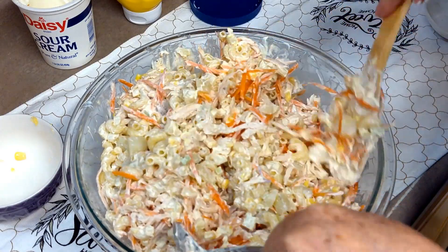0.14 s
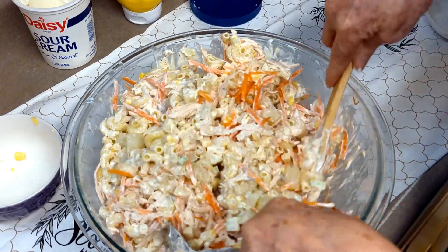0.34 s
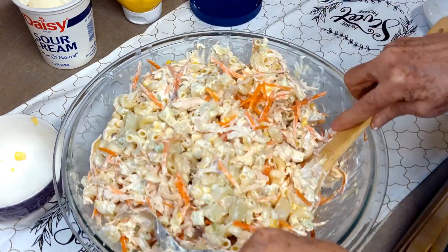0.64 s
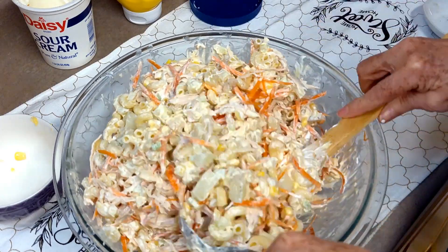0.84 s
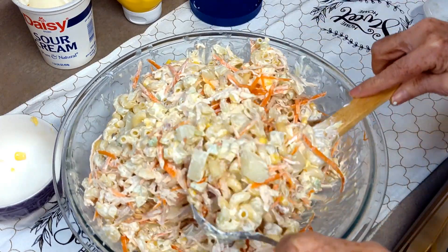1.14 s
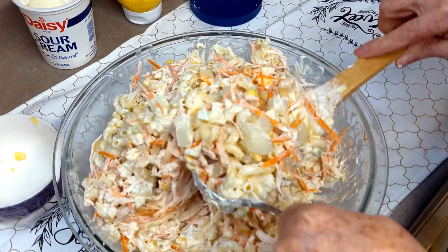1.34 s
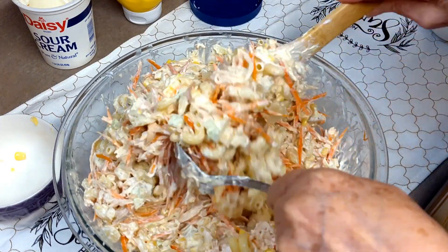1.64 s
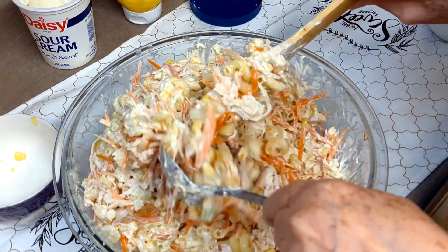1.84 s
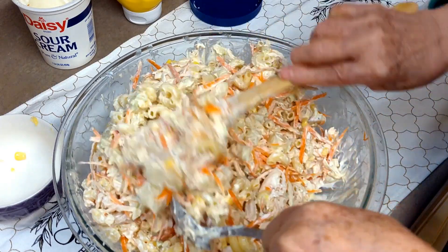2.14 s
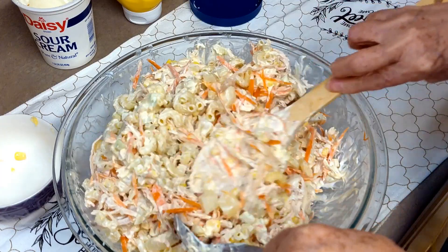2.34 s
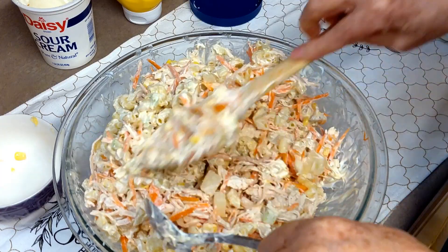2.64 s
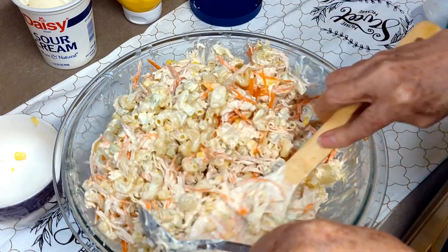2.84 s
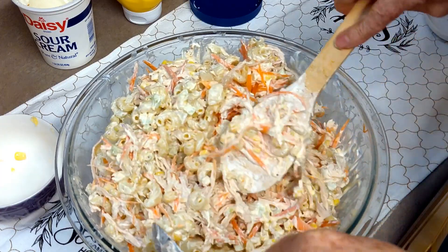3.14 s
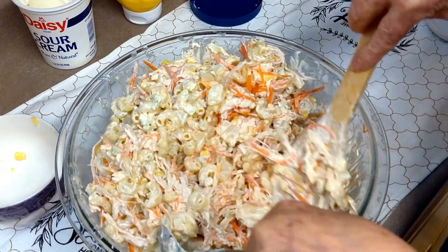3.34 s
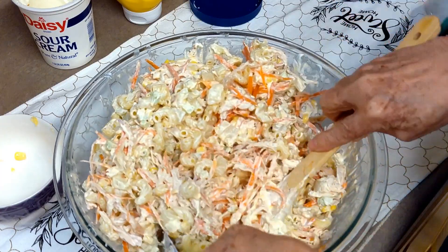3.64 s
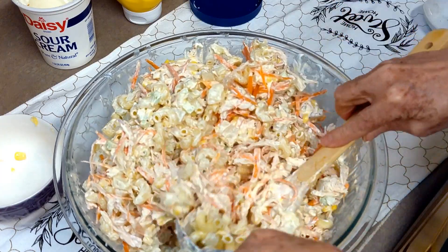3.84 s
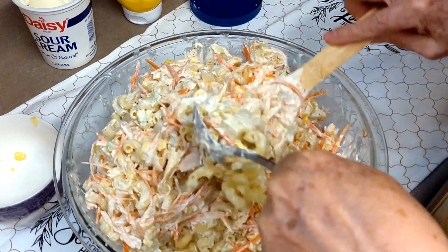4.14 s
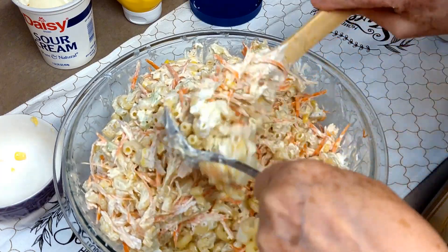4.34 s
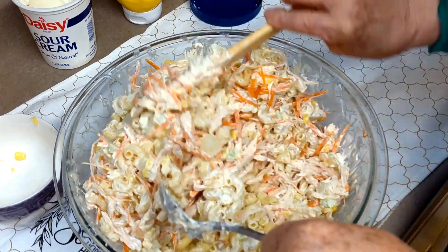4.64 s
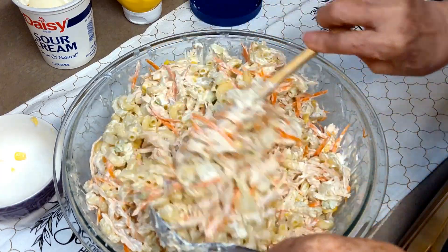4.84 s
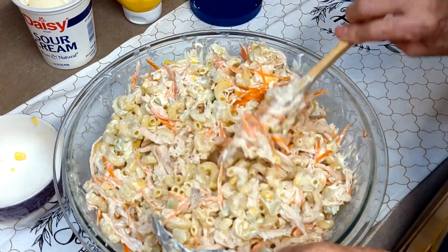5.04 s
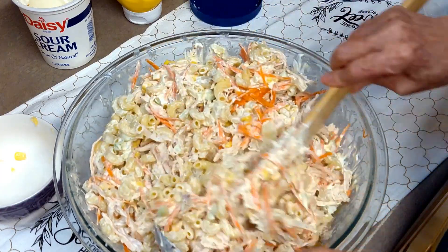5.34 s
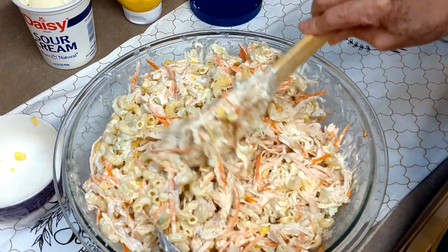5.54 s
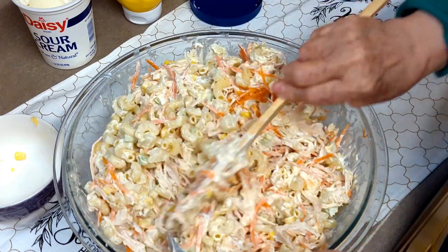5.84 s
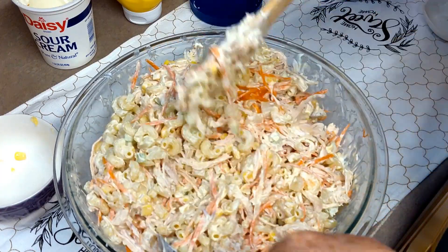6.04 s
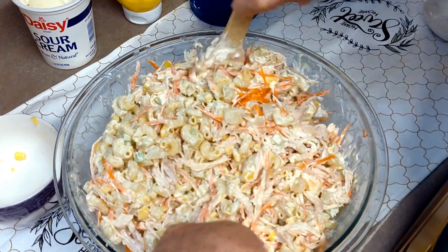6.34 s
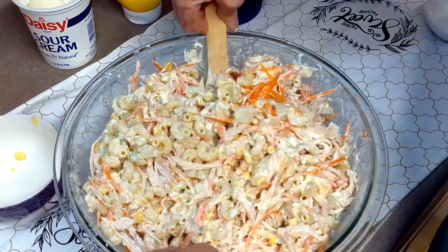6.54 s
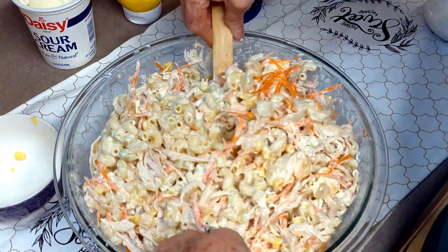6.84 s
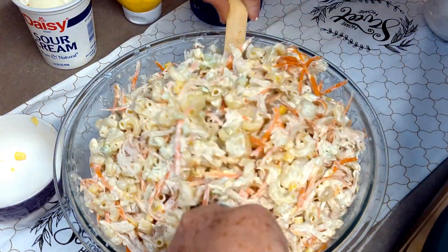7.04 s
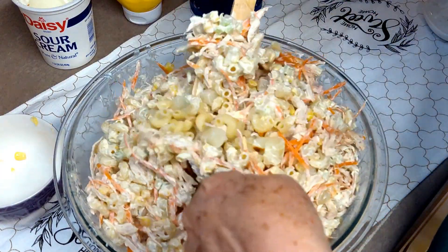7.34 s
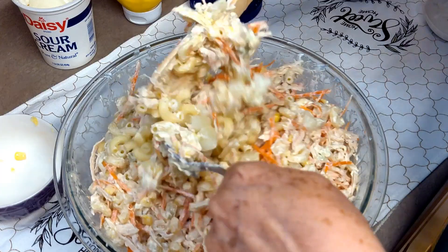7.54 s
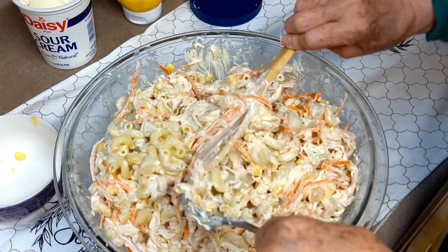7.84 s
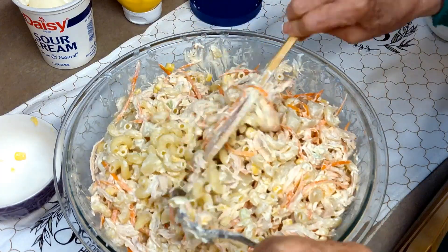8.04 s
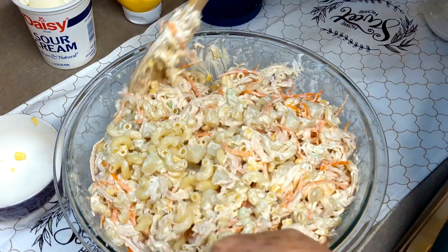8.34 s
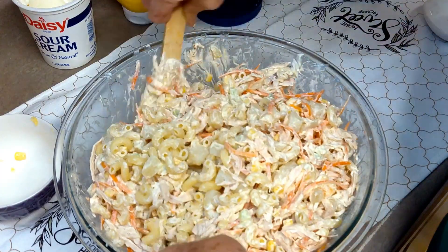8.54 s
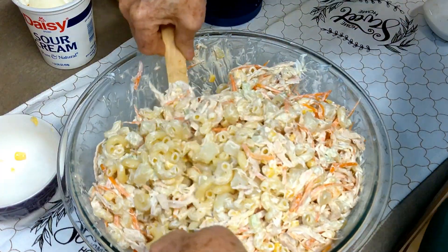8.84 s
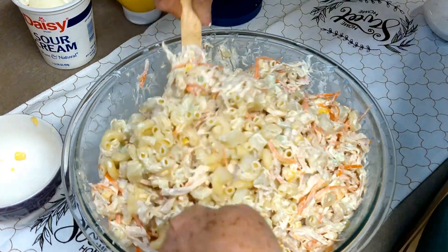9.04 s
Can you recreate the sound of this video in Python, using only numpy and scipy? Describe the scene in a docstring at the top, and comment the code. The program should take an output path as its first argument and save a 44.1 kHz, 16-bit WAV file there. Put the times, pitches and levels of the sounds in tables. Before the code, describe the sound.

In a small home kitchen with a faint motor hum, a spoon clinks a large full glass bowl and scrapes it briefly. Soft wet folding follows, with sticky squelches, crackling dressing and dull wooden knocks against the glass. After quieter stretches, a sharper clack comes near six seconds, a hollow knock near eight, then a bright rim clink and a last knock. Everything is close, heard from just above the bowl.

```python
"""Faint kitchen air and a motor hum, then a spoon rings a big glass bowl on the kitchen table.
A wooden and a metal spoon fold a creamy pasta salad: clinks and knocks are decaying modes and noise bursts,
rubs are trains of tiny slips, and the wet salad is many short decaying tones with pops and rasps.
A small room answers the rubs and wet sounds; shoves rumble and bumps thump on the table.
All of it is heard close, at one microphone above the bowl."""
import sys
import numpy as np
from scipy import signal
from scipy.fft import rfft, irfft, next_fast_len
from scipy.io import wavfile
from scipy.ndimage import uniform_filter1d, map_coordinates

SR = 44100
rng = np.random.default_rng(int(sys.argv[2]) if len(sys.argv) > 2 else 0)


def unload_wav(signal):
    """Save mono or channel-first audio to the path in sys.argv[1] as 16-bit WAV at rate SR, clipped to [-1, 1]."""
    wavfile.write(
        sys.argv[1],
        SR,
        np.round(np.clip(np.atleast_2d(signal).T, -1, 1) * 32767).astype(np.int16),
    )


N = 404838  # length [samples]

# Modes of the filled glass bowl:
# (frequency [Hz], t60 [s], level struck on the wall [dB], level struck on the rim [dB])
GLASS_MODES = [(250, .19, -18, -37), (377, .18, -9, -22), (595, .15, -10, -32), (622, .15, -12, -30),
               (861, .15, -4, -15), (1017, .175, 8, 1.5), (1042, .24, -16, -11), (1124, .17, -23, -12),
               (1887, .27, -23, -25), (2205, .11, -39, -10), (2502, .13, -40, -15), (2653, .15, -38, -14),
               (2885, .2, -30, -13), (2965, .22, -16, -7), (4178, .23, -14, -4), (4388, .12, -34, -15),
               (4740, .11, -12, -14), (4852, .1, -17, -3), (5562, .18, -12, -12), (5654, .095, -11, 1),
               (6068, .12, -28, -9), (6362, .1, -20, -3), (6465, .19, -36, -13), (7376, .17, -38, -19),
               (7701, .16, -44, -24), (10095, .14, -43, -20)]
# Resonances of the bowl's hollow: (frequency [Hz], width [Hz], level [dB])
HOLLOW_MODES = [(585, 36, -1), (719, 17, -3.5), (831.4, 35, 4), (928.5, 45, 4.5)]
# Spectrum of squelching air pockets and food: (frequency [Hz], density [dB per Hz])
SQUELCH_SPECTRUM = [(400, -17), (1000, 10.5), (1850, -5.5), (2450, 2.5), (3300, -18.5), (4700, -10.5),
                    (9000, -39)]
# Spectrum of snapping dressing: (frequency [Hz], density [dB per Hz])
CRACKLE_SPECTRUM = [(1500, -16.5), (3500, -7.5), (4600, 8.5), (5500, -3), (6500, 5), (8200, -17.5),
                    (11000, -30.5), (12000, -46.5)]


def amp(db):
    """Decibels to gain."""
    return 10 ** (np.asarray(db) / 20)


def unit(x):
    """x at rms 1."""
    return x / np.sqrt(np.mean(x ** 2) + 1e-20)


def along(points, hz):
    """(Hz, value) points read on a log frequency axis."""
    f, v = np.transpose(points)
    return np.interp(np.log(hz + 1), np.log(f + 1), v)


def wobble(rate):
    """A smooth random curve through rate knots a second."""
    knots = rng.standard_normal(int(N * rate / SR) + 4)
    return map_coordinates(knots, [np.arange(N) * rate / SR])


def filtered(x, response):
    """x times a response of frequency."""
    m = next_fast_len(len(x) + SR // 4)
    return irfft(rfft(x, m) * response(np.fft.rfftfreq(m, 1 / SR)), m)[:len(x)]


def coloured(x, spectrum):
    """x shaped by (Hz, dB) points."""
    return filtered(x, lambda hz: amp(along(spectrum, hz)))


def resonate(x, peaks):
    """x through parallel (Hz, width in Hz, dB) resonances."""
    def response(f):
        return sum(amp(db) * 1j * f * width / (centre ** 2 - f * f + 1j * f * width)
                   for centre, width, db in peaks)
    return filtered(x, response)


def add(track, s, sound):
    """Mix a sound into the track at s seconds."""
    part = track[round(s * SR):][:len(sound)]
    part += sound[:len(part)]


def fade(t, attack, t60):
    """A quick rise and an exponential fall."""
    return (1 - np.exp(-t / attack)) * amp(-60 * t / t60)


def stroke(start, length, attack, release):
    """The effort of one spoon movement, 0 to 1: it builds up, holds and lets go."""
    t = np.arange(N) / SR - start
    return np.clip(np.minimum(t / attack, 1 - (t - length) / release), 0, 1)


def ticks(rate, spread_db):
    """Impulses at random moments, about rate a second, of random sign and size."""
    present = rng.random(N) < rate / SR
    size = amp(spread_db * np.minimum(rng.exponential(size=N), 3))
    return present * rng.choice([-1, 1], N) * size


def in_room(x, wet_db):
    """x with the kitchen's short, dense answer: noise that decays at its own rate in each band."""
    # decay of the room: (frequency [Hz], t60 [s])
    room_decay = [(200, 0.58), (1500, 0.042), (5000, 0.2), (11000, 0.2)]
    hz, t, z = signal.stft(rng.standard_normal(SR // 2), SR, nperseg=256)
    decay = amp(-60 * t / along(room_decay, hz)[:, None])
    tail = signal.istft(z * decay, SR, nperseg=256)[1]
    return x + amp(wet_db) * signal.fftconvolve(x, tail / np.linalg.norm(tail))[:N]


def kitchen(air_db=-63, whine_hz=5060, whine_width=170, whine_db=-89):
    """Low room noise, a slightly unsteady motor hum and a thin, wavering hiss."""
    # spectrum of the kitchen background: (frequency [Hz], density [dB per Hz])
    air_spectrum = [(20, -2), (50, -13), (80, -27), (155, -9.5), (200, -18), (290, -10.5), (400, -13.5),
                    (780, -16.5), (1100, -25), (1650, -34), (2400, -36.5), (3500, -40.5), (5500, -41.5),
                    (7500, -43.5), (10500, -41.5), (11500, -51.5)]
    # partials of the appliance motor: (frequency [Hz], mean level [dB])
    hum_partials = [(118.4, -75.5), (177.6, -75), (236.9, -70.5), (296.1, -69)]
    t = np.arange(N) / SR
    air = unit(coloured(rng.standard_normal(N), air_spectrum)) * amp(air_db + 0.38 * wobble(5.4))
    drift = 0.00011 * wobble(5.5)  # seconds, shared by all partials
    hum = np.zeros(N)
    for hz, db in hum_partials:
        level = np.sqrt(2) * amp(db + 1.0 * wobble(2.4))  # rms to peak
        hum += level * np.sin(2 * np.pi * hz * (t + drift))
    band = [(whine_hz, whine_width, 0)]
    whine = unit(resonate(resonate(rng.standard_normal(N), band), band))
    return air + hum + whine * amp(whine_db + 1.4 * wobble(7.2))


def shifting(lean_db=-65.5, lump_db=4, attack_s=0.02, release_s=0.042):
    """The leaned-on and shoved bowl rumbles softly and unevenly on the table: low noise under the push."""
    # shoves of the bowl: (start [s], length [s], rumble level [dB])
    shove_list = [(0.194, 0.2, -59.5), (.54, 0.21, -60.5), (2.957, 0.21, -55), (3.32, 0.66, -65.5),
                  (4.134, 0.48, -58.5), (6.585, 0.42, -60.5), (8.55, 0.16, -54.5)]
    # spectrum of the bowl's foot on the table: (frequency [Hz], density [dB per Hz])
    rumble_spectrum = [(20, -0.5), (45, -3.5), (80, -16.5), (150, -9), (220, -14.5), (500, -43.5),
                       (1500, -120)]
    push = amp(lean_db)  # the spoons only lean on the bowl
    for s, length, db in shove_list:
        push = push + amp(db) * stroke(s, length, attack_s, release_s)
    return push * unit(coloured(rng.standard_normal(N), rumble_spectrum) * amp(lump_db * wobble(12)))


def bubbles(rate, centre_hz, pitch_spread, cycles, spread_db):
    """Small bursting films at random moments: short tones, each with its own pitch and size."""
    n = int(rate * N / SR)
    when, pitch, size = rng.random((n, 3)).T[:, :, None]
    hz = centre_hz * np.exp(pitch_spread * np.arcsin(2 * pitch - 1))
    t = np.arange(SR // 40) / SR
    # each tone falls by 60 dB in the given number of cycles
    grains = amp(spread_db * size ** 2) * np.sin(2 * np.pi * hz * t) * fade(t, 2 / hz, cycles / hz)
    index = (when * N).astype(int) + np.arange(len(t))
    return unit(np.bincount(index.ravel(), grains.ravel(), N)[:N])


def scattered(x, rise_s=.0025, t60_s=.07, scatter_db=5):
    """x with many quick reflections around the inside of the bowl, at about the same power."""
    t = np.arange(SR // 8) / SR
    echoes = rng.standard_normal(len(t)) * fade(t, rise_s, t60_s)
    mix = x + amp(scatter_db) * signal.fftconvolve(x, echoes / np.linalg.norm(echoes))[:N]
    return mix / np.hypot(1, amp(scatter_db))


def salad(smear_db=-4, clump_db=2.5, attack_s=0.032, release_s=0.053):
    """Each fold opens air pockets and snaps films of dressing, over a fine sticky smear."""
    # folds of a spoon through the salad:
    # (start [s], length [s], air-pocket squelch level [dB], dressing crackle level [dB])
    fold_list = [(0.437, 0.63, -83, -86.5), (2.222, 0.14, -84, -70.5), (2.37, 0.24, -78, -80),
                 (2.832, 0.082, -83, -66), (2.938, 0.19, -67.5, -82), (3.553, 0.048, -79, -61.5),
                 (3.982, 0.31, -78.5, -85), (4.772, 0.2, -74, -77), (5.363, 0.13, -62, -66),
                 (5.53, 0.13, -79, -71), (5.868, 0.162, -69.5, -63), (6.298, 0.21, -82.5, -72),
                 (6.503, 0.16, -77, -77), (6.86, 0.45, -76, -86.5), (8.566, 0.14, -63.5, -70.5),
                 (8.763, 0.18, -70, -87.5)]
    squelch_gain, crackle_gain = amp(-91.5), amp(-86)  # the salad settling between folds
    for s, length, squelch_db, crackle_db in fold_list:
        effort = stroke(s, length, attack_s, release_s)
        squelch_gain = squelch_gain + amp(squelch_db) * effort
        crackle_gain = crackle_gain + amp(crackle_db) * effort
    squelch = bubbles(rate=130, centre_hz=2450, pitch_spread=.08, cycles=18, spread_db=11)
    crackle = unit(sum(bubbles(rate=60, centre_hz=hz, pitch_spread=.125, cycles=19, spread_db=16)
                       for hz in (4650, 6400)))
    squelch += amp(smear_db) * unit(coloured(ticks(300, spread_db=5), SQUELCH_SPECTRUM))
    crackle += amp(smear_db) * unit(coloured(ticks(500, spread_db=5), CRACKLE_SPECTRUM))
    wet = scattered(squelch) * squelch_gain + scattered(crackle) * crackle_gain
    return in_room(wet * amp(clump_db * wobble(22)), wet_db=-9.5)


def glass_ring(t, drive, place=0, scatter_db=1.5):
    """The bowl's modes after one blow; drive is the blow's strength at each frequency."""
    place = np.clip(place, 0, 1)  # 0 wall, 1 rim
    rise_cycles = 3  # low modes build up more slowly
    blur_hz = 4  # the shifting load roughens every mode
    split_hz, twin_db = 16, -14  # the bowl is not quite round: each mode beats with a weaker twin

    def tone(hz):
        drift = np.cumsum(rng.standard_normal(len(t))) * np.sqrt(2 * np.pi * blur_hz / SR)
        return np.sin(2 * np.pi * (hz * t + rng.random()) + drift)

    ring = np.zeros(len(t))
    for hz, t60, wall_db, rim_db in GLASS_MODES:
        level_db = wall_db + place * (rim_db - wall_db) + scatter_db * rng.normal()
        pair = tone(hz) + amp(twin_db) * tone(hz + split_hz * rng.normal())
        ring += amp(level_db) * drive(hz) * fade(t, rise_cycles / hz, t60) * pair
    return ring


def hollow_ring(t):
    """The bowl's hollow after one blow: a few low tones, the wider the sooner gone."""
    ring = np.zeros(len(t))
    for hz, width, db in HOLLOW_MODES:
        t60 = np.log(1000) / np.pi / width
        tone = np.sin(2 * np.pi * (hz * t + rng.random()))
        ring += amp(db + rng.normal()) * tone * fade(t, .002, t60)
    return ring / 2


def patchy(n, depth_db=5):
    """Noise whose narrow bands swell and sink, like many close overtones beating."""
    z = signal.stft(rng.standard_normal(n), nperseg=512)[2]
    field = uniform_filter1d(rng.standard_normal(z.shape), size=7, axis=1)
    return unit(signal.istft(z * amp(depth_db * unit(field)), nperseg=512)[1][:n])


def clinks(crack_t60=0.076, shimmer_t60=0.27):
    """A hard blow cracks, rings the glass and its hollow and leaves an uneven, noisy shimmer."""
    # sharp blows on the bare glass: (time [s], place [0 wall - 1 rim], ring level [dB], crack level [dB],
    # brightness [dB per octave], shimmer level [dB], hollow level [dB])
    clink_list = [(0.202, 0.02, -14.5, -15, 2.5, -26, -28), (8.371, 1, -13.5, -3.5, 3, -19, -38.5)]
    # spectrum of the hard contact: (frequency [Hz], density [dB per Hz])
    crack_spectrum = [(60, -18.5), (250, -12), (520, -16.5), (950, 9), (1400, -5), (1950, -15), (2500, -6),
                      (3400, -13.5), (4700, -3), (6300, -2.5), (8200, -23), (11000, -30), (12000, -56)]
    out, t = np.zeros(N), np.arange(SR // 2) / SR
    for s, place, ring_db, crack_db, tilt, shimmer_db, hollow_db in clink_list:
        crack = amp(crack_db) * rng.standard_normal(len(t)) * fade(t, .002, crack_t60)
        shimmer = amp(shimmer_db) * patchy(len(t)) * fade(t, .006, shimmer_t60)
        bright = filtered(coloured(crack + shimmer, crack_spectrum),
                          lambda hz: amp(tilt * np.log2((hz + 50) / 1000)))
        ring = amp(ring_db) * glass_ring(t, lambda hz: 1, place)
        add(out, s, ring + amp(hollow_db) * hollow_ring(t) + bright)
    return out


def hollowed(x, edge_hz=1250):
    """x through the hollow of the bowl, which passes little treble."""
    return filtered(resonate(x, HOLLOW_MODES), lambda hz: 1 / (1 + (hz / edge_hz) ** 6))


def rubs(slip_rate=1400, hollow_db=-9, glass_db=-3, groan_db=0.0, waver=0.02, soft_hz=4700, place=0.17,
         grit_db=-21, slack=.08):
    """Tiny slips of a spoon keep glass and hollow sounding; under full pressure they lock into a groan."""
    # drags of a spoon along the glass:
    # (start [s], length [s], level [dB], groan pitch at full pressure, before waver [Hz])
    rub_list = [(0.257, 0.073, -40, 993), (0.299, 0.021, -44, 875), (0.349, 0.038, -45, 895),
                (3.3, 0.064, -58, 1027), (3.382, 0.095, -47.5, 846), (6.53, 0.1, -58, 996),
                (6.571, 0.038, -47.5, 1000)]
    attack_s, release_s = 0.015, 0.032
    damped_hz = 7  # the pressing spoon widens every mode
    modes = [(hz, damped_hz + np.log(1000) / np.pi / t60, wall_db + place * (rim_db - wall_db))
             for hz, t60, wall_db, rim_db in GLASS_MODES]
    slips = ticks(slip_rate, spread_db=-0.5)
    glass = filtered(resonate(slips, modes), lambda hz: 1 / (1 + (hz / soft_hz) ** 6))
    sound = amp(glass_db) * unit(glass) + amp(hollow_db) * unit(hollowed(hollowed(slips)))
    sound += amp(grit_db) * unit(coloured(slips, SQUELCH_SPECTRUM))  # food caught under the spoon
    speed, grip = 1 + waver * wobble(60), amp(3.5 * wobble(45))
    out = np.zeros(N)
    for s, length, db, groan_hz in rub_list:
        pressure = stroke(s, length, attack_s, release_s)
        clock = np.cumsum(speed + slack * (1 - pressure)) / SR  # the groan sinks as the spoon bears down
        groan = unit(np.sin(2 * np.pi * groan_hz * clock) * grip)
        out += amp(db) * pressure * (sound + amp(groan_db) * groan * pressure)
    return in_room(out, wet_db=-4.5)


def pops(pop_db=-7, snap_db=-19, pop_t60=0.022, snap_t60=0.029, wet_db=1):
    """An air pocket tears open with a wet snap and rings briefly at its pitch; low pockets snap dully."""
    # single air pockets bursting: (time [s], level [dB], pitch [Hz])
    pop_list = [(0.374, -37.5, 4730), (0.457, -47, 4660), (0.999, -46, 6300), (1.3, -50.5, 6010),
                (2.4017, -36.5, 4000), (2.6, -42, 2440), (3.0374, -33, 2160), (3.6, -35.5, 4230),
                (3.685, -29, 3370), (4.492, -35.5, 2780), (5.393, -32.5, 3600), (5.441, -32.5, 6070),
                (5.465, -33, 2650), (5.887, -39, 4650), (6.503, -36.5, 6060), (6.597, -40, 4270),
                (6.7, -43.5, 4730)]
    half_width = .12  # half bandwidth of a pocket, as a share of its pitch
    out, t = np.zeros(N), np.arange(SR // 10) / SR
    for s, db, hz in pop_list:
        tear, spray = rng.standard_normal((2, len(t)))
        cavity = [(hz, 2 * half_width * hz, 0)]
        ring = unit(resonate(resonate(tear, cavity), cavity)) * fade(t, 0.0046, pop_t60)
        wet_noise = coloured(spray, CRACKLE_SPECTRUM) + coloured(spray, SQUELCH_SPECTRUM)
        snap = unit(filtered(wet_noise, lambda f: 1 / (1 + (f / (2 * hz)) ** 2)))
        add(out, s, amp(db) * (amp(pop_db) * ring + amp(snap_db) * snap * fade(t, 0.00022, snap_t60)))
    return in_room(out, wet_db)


def knocks(clack_t60=0.11, tail_t60=0.26, tail_db=-11, mute_t60=0.98, thud_t60=0.12):
    """Wood cushioned by salad: the softer the contact, the duller the clack; the table takes the push."""
    # wooden spoon blows: (time [s], clack level [dB], contact corner [Hz], hollow level [dB],
    # glass ring level [dB], table thud level [dB], thud corner [Hz])
    knock_list = [(0.614, -33.5, 2080, -32, -42, -28.5, 240), (2.863, -22, 1700, -35.5, -66, -43, 181),
                  (3.168, -37, 3170, -43, -52, -59, 200), (3.623, -17, 2050, -31.5, -47.5, -29, 219),
                  (5.907, -15, 6900, -64, -36, -53, 400), (5.914, -26, 2000, -50, -44, -31.5, 330),
                  (5.978, -46, 1600, -55, -50.5, -49, 200), (6.725, -36, 3150, -69, -62, -62, 200),
                  (7.942, -18, 2450, -25.5, -40.5, -52, 400), (8.737, -19.5, 2400, -23.5, -44, -27, 315)]
    # spectrum of wood on glass: (frequency [Hz], density [dB per Hz])
    clack_spectrum = [(60, -72), (330, -2), (500, -3.5), (1000, 0), (1400, -7), (1950, -11), (2250, -4),
                      (2600, -5.5), (3300, -11.5), (4500, -3), (6500, -3.5), (8500, -15.5), (11000, -27.5),
                      (12000, -44.5)]
    # spectrum of the table: (frequency [Hz], density [dB per Hz])
    thud_spectrum = [(20, -4), (45, -4.5), (75, -5), (125, -2.5), (180, -11), (240, 3.5), (350, -4),
                     (600, 3), (2000, -55)]
    out, t = np.zeros(N), np.arange(SR // 2) / SR
    for s, clack_db, corner_hz, hollow_db, ring_db, thud_db, thud_hz in knock_list:
        drive = lambda hz: 1 / np.sqrt(1 + (hz / corner_hz) ** 6)
        clack_noise, thud_noise = rng.standard_normal((2, len(t)))
        contact_s = 4 / corner_hz  # soft contacts build up slowly
        clack_fade = fade(t, contact_s, clack_t60) + amp(tail_db) * fade(t, 0.02, tail_t60)
        clack = filtered(coloured(clack_noise, clack_spectrum), drive) * clack_fade
        push = filtered(coloured(thud_noise, thud_spectrum), lambda hz: 1 / (1 + (hz / thud_hz) ** 4))
        thud = unit(push) * fade(t, 0.0097, thud_t60)
        ring = glass_ring(t, drive) * amp(-60 * t / mute_t60)  # the spoon stays on the glass and mutes it
        blow = amp(clack_db) * clack + amp(hollow_db) * hollow_ring(t)
        add(out, s, blow + amp(ring_db) * ring + amp(thud_db) * thud)
    return out


def bumps(attack_s=0.0035, cycles=13.4):
    """The bowl rocks and drops back on the table: a low tone that falls by 60 dB in a few cycles."""
    # thumps of the bowl: (time [s], level [dB], pitch [Hz])
    bump_list = [(0.656, -40, 48.4), (2.955, -52, 29.5), (4.425, -53, 36), (6.781, -36, 106),
                 (6.79, -45, 38)]
    out, t = np.zeros(N), np.arange(SR // 2) / SR
    for s, db, hz in bump_list:
        add(out, s, amp(db) * np.sin(2 * np.pi * hz * t) * fade(t, attack_s, cycles / hz))
    return out


def squeak(start_s=1.23, length_s=0.027, edge_s=.01, level_db=-67.5, pitch_hz=3870):
    """Wet food slips on the glass with one brief, thin, slightly wavering tone."""
    clock = np.cumsum(1 + .004 * wobble(80)) / SR
    return amp(level_db) * stroke(start_s, length_s, edge_s, edge_s) * np.sin(2 * np.pi * pitch_hz * clock)


def sucks(wet_db=-3, attack_s=0.018, length_s=0.0064, release_s=0.034):
    """Salad peels off a spoon: a run of tiny tears keeps one air pocket sounding as a narrow rasp."""
    # salad peeling off: (time [s], level [dB], pitch [Hz])
    suck_list = [(2.959, -54, 2360), (4.11, -71, 2800), (4.766, -56, 2190), (6.62, -53, 2380),
                 (6.642, -56, 2580), (8.657, -55, 2350), (8.82, -55, 2460), (8.867, -59, 2430),
                 (9.045, -56, 2460)]
    width = 0.18  # of each resonance, as a share of the pitch
    out = np.zeros(N)
    for s, db, hz in suck_list:
        cavity = [(hz, width * hz, 0)]
        rasp = unit(resonate(resonate(ticks(1500, spread_db=2), cavity), cavity))
        out += amp(db) * rasp * stroke(s, length_s, attack_s, release_s)
    return in_room(out, wet_db)


def scene():
    """Everything at one microphone above the bowl."""
    background = kitchen() + shifting()
    wet = salad() + pops() + squeak() + sucks()
    spoons = clinks() + rubs() + knocks() + bumps()
    return (background + wet + spoons)[None]


def record(dry, hiss_db=-91, mic_hz=11400, top_hz=15700):
    """The top treble falls away; the recorder adds hiss, clips at full scale and limits the band."""
    lowpass = signal.ellip(8, .2, 70, mic_hz, fs=SR, output="sos")
    heard = signal.sosfilt(lowpass, dry[0])
    taped = np.clip(heard + amp(hiss_db) * rng.standard_normal(N), -1, 1)
    return filtered(taped, lambda hz: hz < top_hz)[None]


dry = scene()
out = record(dry)
unload_wav(out)
```